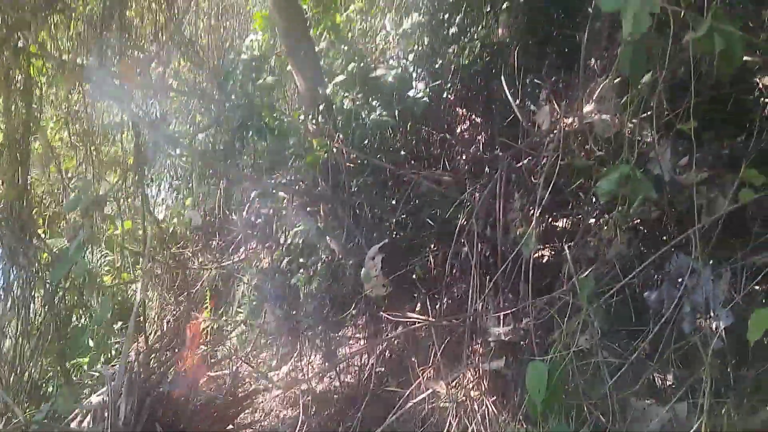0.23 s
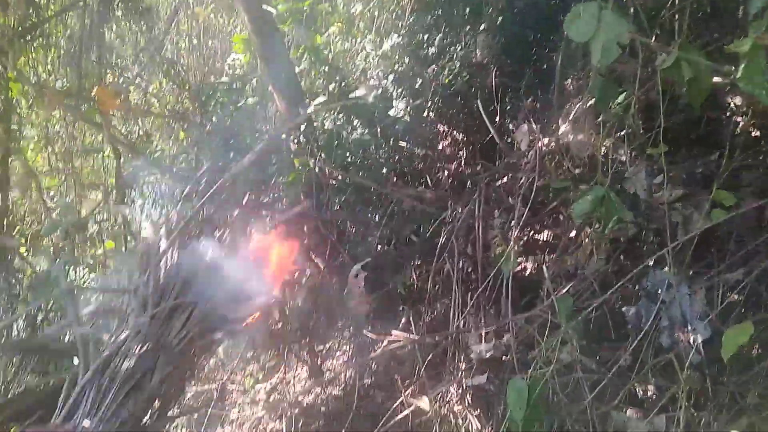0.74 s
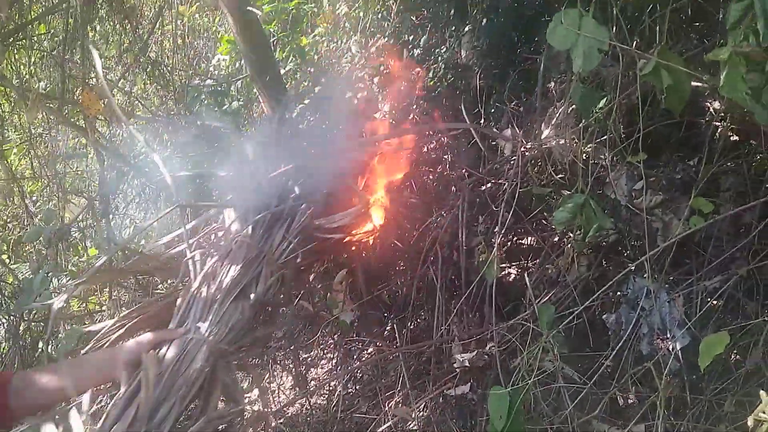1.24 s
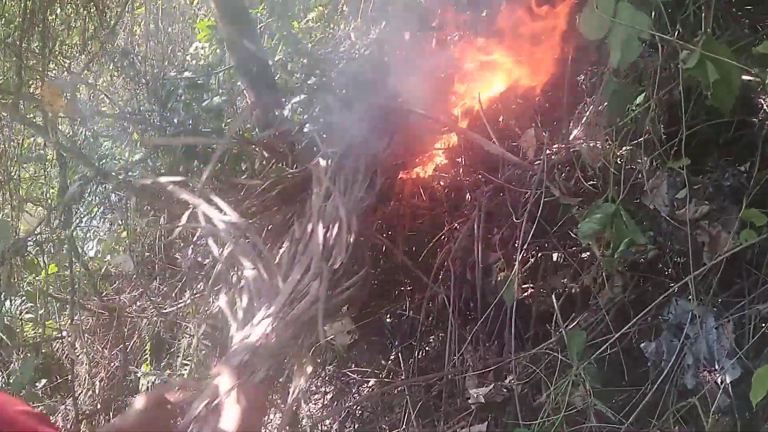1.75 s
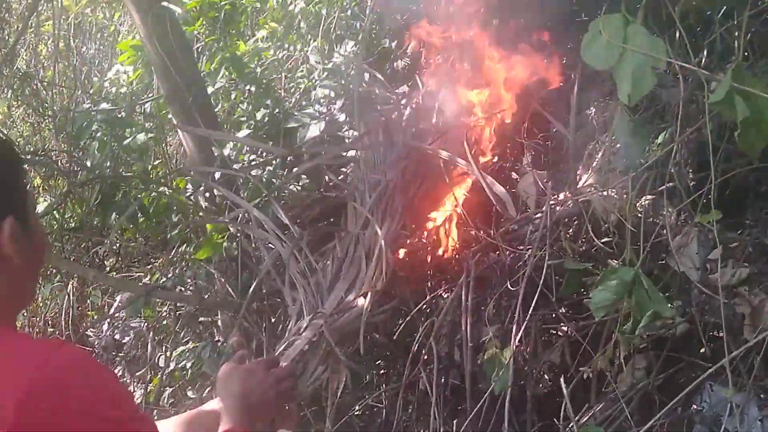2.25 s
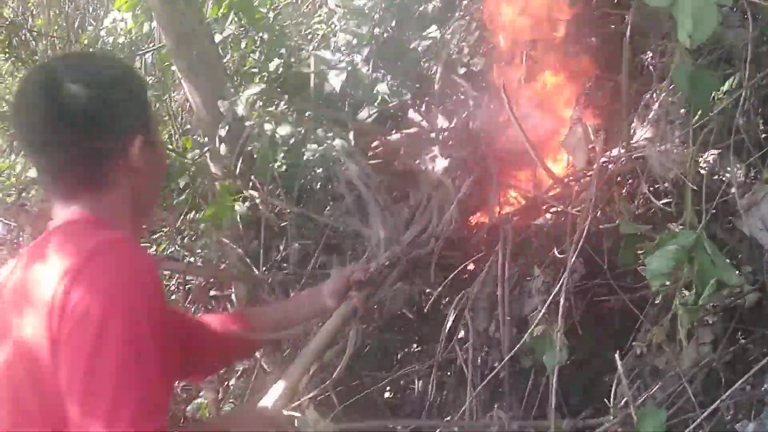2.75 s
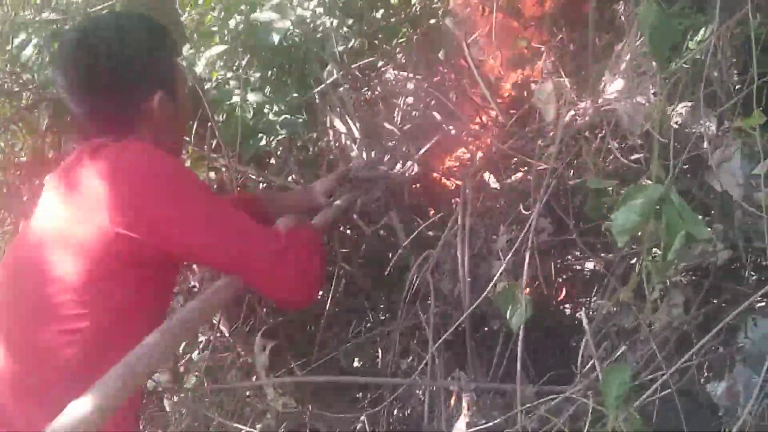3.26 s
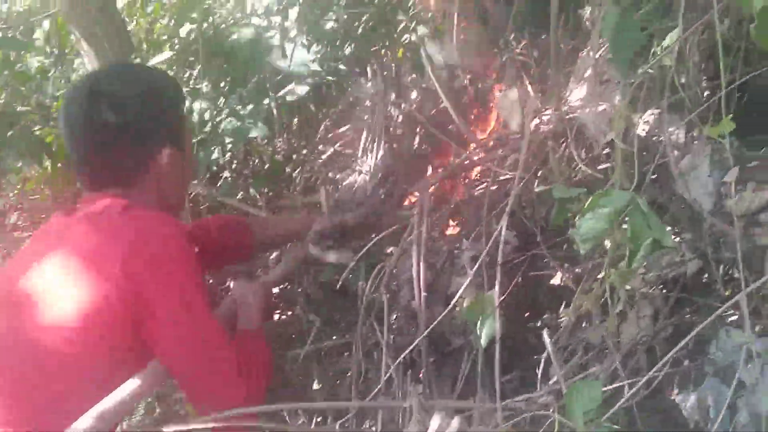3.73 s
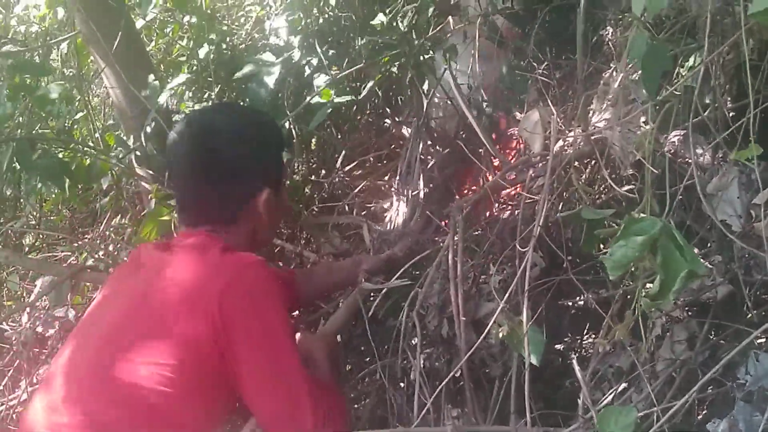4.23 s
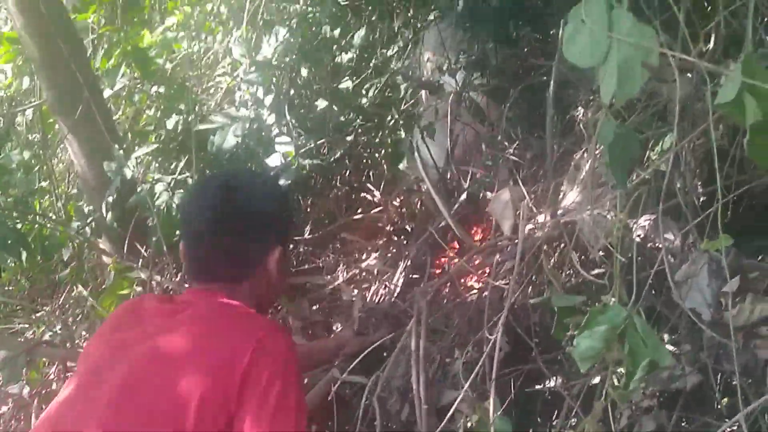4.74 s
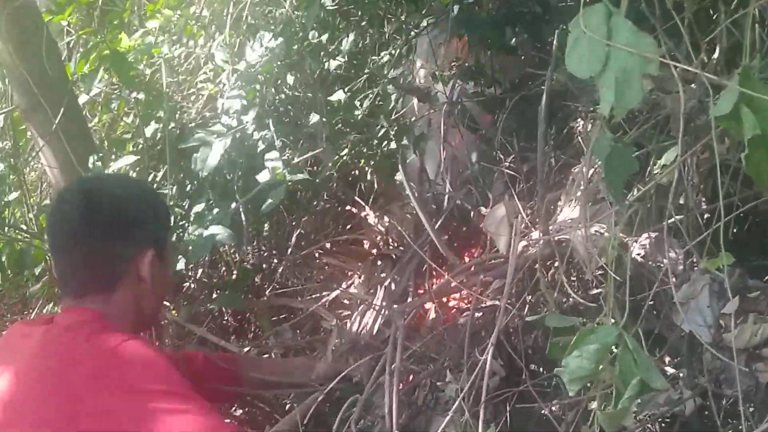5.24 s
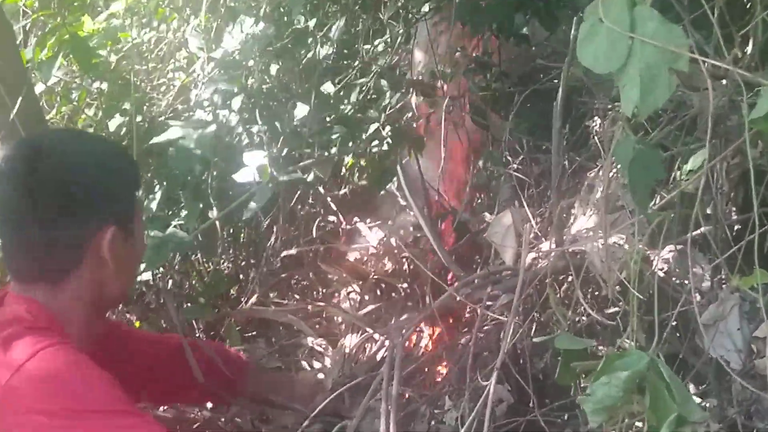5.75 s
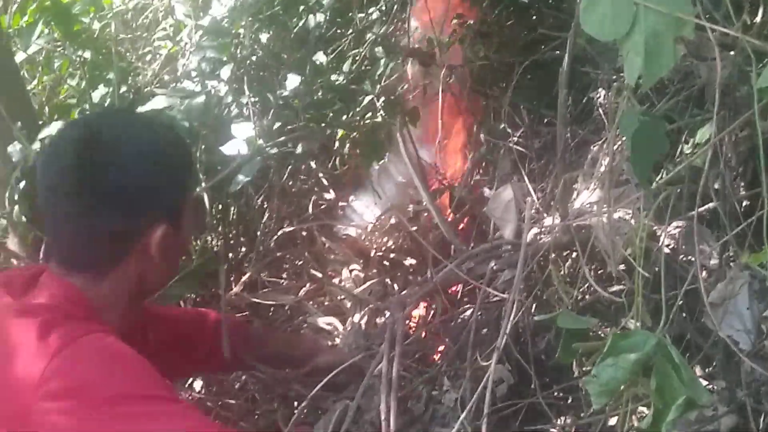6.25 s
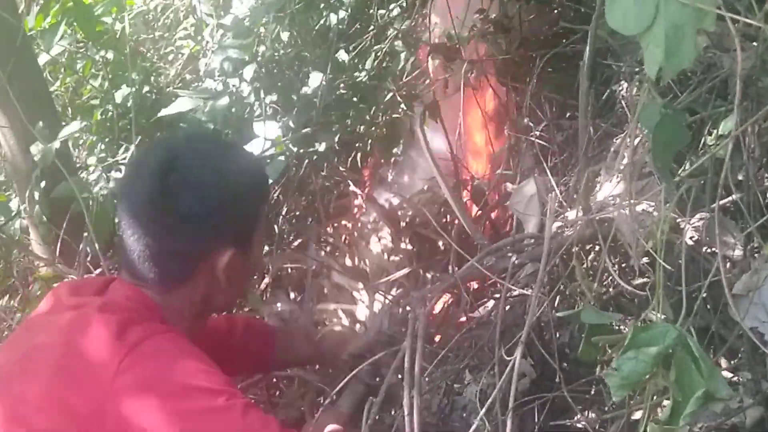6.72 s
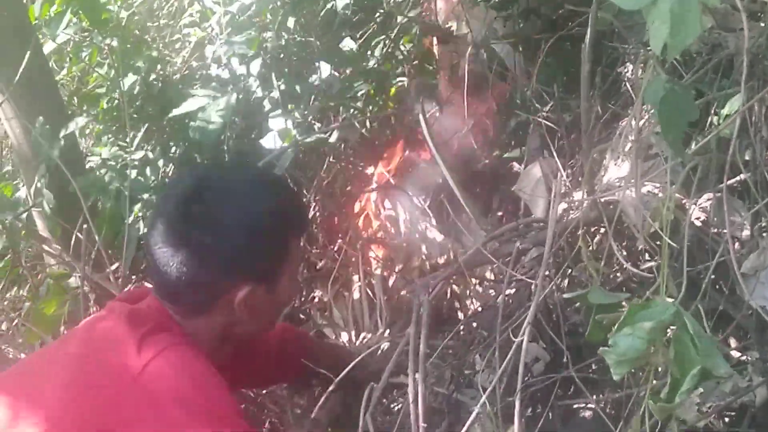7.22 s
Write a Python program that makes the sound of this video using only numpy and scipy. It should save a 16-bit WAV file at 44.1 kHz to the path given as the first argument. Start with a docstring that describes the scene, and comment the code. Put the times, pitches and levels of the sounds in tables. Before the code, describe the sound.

Burning dry leaves hiss and sizzle in uneven flares outdoors, with sharp bright crackles and pops and a few woody knocks of handled stalks.

```python
"""A torch of dry stalks is pushed into dead brush outdoors: burning leaves hiss and sizzle in flares.
The hiss is noise mixed with thousands of tiny rings, made louder and brighter by the heat.
Stems burst with sharp clicks, and scattered copies of each click come back from the thicket.
Stalks knock, rustle and squeak close to a hand-held camera, made from short rings, noise and gliding tones.
Underneath lie softly fluttering flames, a low rumble and a faint far drone, all of shaped noise."""
import sys
import numpy as np
from scipy import signal
from scipy.fft import rfft, irfft, next_fast_len
from scipy.io import wavfile
from scipy.ndimage import map_coordinates

SR = 44100
rng = np.random.default_rng(int(sys.argv[2]) if len(sys.argv) > 2 else 0)


def dump(signal):
    """Clip the signal to [-1, 1] and save it as 16-bit WAV at the path in sys.argv[1]."""
    limited = np.clip(np.atleast_2d(signal).T, -1, 1)
    pcm = np.round(limited * 32767).astype(np.int16)
    wavfile.write(sys.argv[1], SR, pcm)


N = 330088

# The far drone. Each row: time in seconds, level in dB.
DRONE_LEVEL = [(3.5, -100), (5.45, -90), (5.6, -77.5), (5.9, -75.5), (6.05, -83), (6.33, -85),
               (6.45, -76.5), (6.9, -76.5), (7.4, -76.5)]
# Colour of the open-air rumble. Each row: frequency in Hz, relative strength in dB.
RUMBLE_COLOUR = [(15, -10.5), (25, 1), (50, -2.5), (80, -5), (120, -10.5), (230, -19), (400, -24),
                 (700, -24.5), (1500, -32)]
# How alike left and right sound outdoors. Each row: frequency in Hz, likeness from 0 to 1.
LEFT_RIGHT_LIKENESS = [(30, 0.2), (70, 0.97), (630, 0.87), (1400, 0.5), (3000, 0.15), (6500, 0)]
# Faint thin squeaks, perhaps of stalks rubbing. Each row: middle in seconds, level in dB, pitch in Hz,
# half width in seconds, glide in Hz per second.
SQUEAK_EVENTS = [(4.17, -71, 1340, .018, 0), (5.725, -69.5, 2450, .016, 4500),
                 (5.76, -73, 2170, .016, -4000), (5.8, -72, 2180, .014, -1500), (5.81, -74.5, 2790, .02, 0),
                 (5.82, -73.5, 1540, .02, 3000), (5.845, -71, 2170, .028, 1500),
                 (5.864, -69, 1570, .014, 2000), (5.903, -70, 1520, .014, -2500),
                 (7.355, -68, 1900, .022, 2000)]
# Stalks knocking against the brush. Each row: start in seconds, clack in dB, thud in dB, ring in Hz,
# clean ring over the clack in dB.
KNOCK_EVENTS = [(0.780, -59, -49.5, 700, -16), (1.0084, -45, -65, 2060, -12), (1.14, -75, -60.5, 500, -16),
                (1.297, -51.5, -55, 756, -17), (2.53, -56, -64, 550, -14), (3.846, -38.5, -52, 2000, -8),
                (3.855, -45.5, -51, 1410, -18), (4.259, -49.5, -76, 1910, -20),
                (4.266, -52.5, -77, 1160, -18), (4.68, -51.5, -74, 1550, 11), (4.746, -58, -58, 600, -16),
                (5.038, -60, -74, 560, -12), (6.175, -59.5, -58.5, 590, -8), (7.31, -59, -76, 540, 1),
                (7.35, -57, -62, 1890, -10)]
# How a split, hollow stalk rings. Each row: multiple of its ring pitch, level in dB,
# time to fall 60 dB in seconds.
STALK_RINGS = [(.77, -7, .06), (1, 0, .035), (1.11, -3, .03), (1.26, -5, .03)]
# How the heap answers a push. Each row: frequency in Hz, relative strength in dB.
HEAP_COLOUR = [(60, 5), (130, -4.5), (210, 3.5), (350, -5.5), (800, -9.5), (2000, -18)]
# Colour of shifting leaves. Each row: frequency in Hz, relative strength in dB.
LEAF_COLOUR = [(88, -38), (150, -15.5), (296, -6.5), (377, -8), (637, -4), (782, -6), (1500, -1),
               (2320, 1.5), (2960, -1), (3200, 0.5), (4160, -15), (7040, -120)]
# Stalks shoved through the leaves. Each row: middle in seconds, rustle in dB, half width in seconds.
SHOVE_EVENTS = [(.2, -67.5, 0.19), (7.36, -67, 0.033)]
# How hard the leaves burn: the heap catches, is smothered, and catches again.
# Each row: time in seconds, hiss in dB.
BLAZE_LEVEL = [(0, -48.5), (.45, -46.5), (.72, -43.5), (1.38, -45), (1.53, -42), (2.4, -40), (3.02, -36.5),
               (3.44, -42), (3.8, -40), (3.92, -47), (4.42, -55.5), (5.3, -52), (6.05, -54.5), (6.4, -55),
               (6.65, -61), (6.76, -46.5), (7.2, -43), (7.41, -52.5)]
# A tuft flares up and dies down. Each row: middle in seconds, hiss in dB, half width in seconds.
FLARE_EVENTS = [(0.087, -48.5, 0.011), (0.205, -42, 0.023), (0.66, -48, 0.014), (0.83, -49, 0.044),
                (0.98, -41, 0.015), (1.255, -38, 0.032), (1.9, -38, 0.032), (2.294, -36.5, 0.022),
                (2.511, -36, 0.032), (2.92, -40, 0.027), (3.154, -40.5, 0.011), (3.33, -43, 0.028),
                (3.854, -35, 0.024), (4.21, -45.5, 0.14), (4.61, -45.5, 0.099), (4.83, -40.5, 0.069),
                (4.95, -48.5, 0.15), (5.43, -52.5, 0.076), (6.14, -52, 0.05), (6.57, -51, 0.12)]
# Stems bursting. Each row: start in seconds, crack in dB, pitch in Hz, body in dB, treble in dB,
# splintering in seconds.
STEM_POPS = [(0.1846, -38.5, 7000, 5, 2, .001), (0.3558, -41.5, 8200, 4, 2, .0005),
             (0.4883, -34, 8000, 2, 2, .0002), (0.5153, -27.5, 8000, 4, 1, .0006),
             (0.5729, -28.5, 7500, 3, 3, .0005), (0.5845, -37, 7500, 4, 0, .0003),
             (0.7435, -34, 6000, 13, 0, .0009), (.8032, -38, 7500, 6, 0, .0006),
             (.8216, -37, 7500, 6, 0, .0005), (0.8704, -37, 3600, 20, 0, .0008),
             (.9653, -39, 7500, 8, 0, .0005), (0.9743, -34.5, 4200, 15, 0, .0008),
             (1.0096, -17.5, 8400, 4, -4, .0008), (1.1148, -38, 3800, 18, 0, .0008),
             (1.2567, -33, 7600, 4, -2, .0005), (1.2639, -28, 7200, 3, -2, .001),
             (1.339, -19, 8900, 1, -2, .0002), (1.4739, -38, 8100, 0, 0, .0003),
             (1.4914, -36.5, 7800, 10, 0, .0005), (1.6165, -32, 3700, 17, 0, .0008),
             (1.7267, -41.5, 3700, 19, 0, .0006), (1.748, -32.5, 3700, 15, 0, .0014),
             (1.8684, -36, 3700, 14, 0, .001), (1.8982, -31, 8100, 2, -3, .0006),
             (1.9055, -33, 7300, 2, -3, .0005), (1.9283, -38, 3700, 17, 0, .0004),
             (2.1667, -35, 8000, 0, 0, .0003), (2.2941, -30, 7600, 0, -2, .0006),
             (2.3143, -32, 9000, 2, 0, .0004), (2.33, -21.5, 9800, -1, 0, .0003),
             (2.5261, -31, 8300, 2, 0, .0004), (2.619, -35, 3700, 16, 0, .0006),
             (2.6409, -31.5, 8800, 2, 0, .0003), (2.8076, -33, 8700, 4, 0, .0003),
             (3.0485, -18, 10500, 0, -1, .0014), (3.1524, -32, 8300, 0, -2, .0006),
             (3.334, -33, 8600, 2, 0, .0005), (3.542, -27.5, 8900, 3, 0, .0009),
             (3.5732, -32, 8600, -3, 0, .0002), (3.8388, -31, 9000, 3, 0, .0004),
             (4.0471, -44.5, 3600, 18, 0, .0006), (4.0831, -41, 8800, 1, 0, .0003),
             (4.1437, -36, 9700, 1, 0, .0007), (4.2091, -39, 9000, 2, 0, .0003),
             (4.2469, -29.5, 8900, 1, 0, .0002), (4.6803, -22.5, 10800, 3, -1, .0008),
             (4.9601, -42, 8800, 3, 0, .0004), (5.3776, -44, 9300, 2, 0, .0004),
             (5.4186, -36.5, 9600, 6, 0, .0005), (5.5653, -46, 9300, 2, 0, .0005),
             (5.9313, -46, 9500, 2, 2, .0003), (6.1037, -40, 10500, 0, 3, .0002),
             (6.1099, -42, 11000, 6, 1, .0003), (6.1969, -44, 9700, 0, 2, .0004),
             (6.4883, -22, 11000, -3, 1, .0015), (6.4989, -38.5, 9800, -3, 0, .0005),
             (6.6719, -38.5, 10300, -6, 2, .0003), (6.6756, -41, 8700, -1, 0, .0004),
             (6.7007, -29, 9500, -1, -1, .0007), (6.7084, -36, 9500, 0, 0, .0003),
             (6.7146, -33.5, 9400, -1, 0, .0006), (6.8551, -38.5, 9600, 0, 0, .0003),
             (6.8647, -38.5, 9800, -1, 0, .0004), (6.969, -37.5, 9600, 0, 0, .0004),
             (6.9832, -34.5, 10000, -1, 0, .0004), (7.0765, -24, 10000, 2, 2, .00015)]
# Colour shared by all burst stems. Each row: frequency in Hz, relative strength in dB.
STEM_COLOUR = [(300, -39), (1000, -31), (1700, -25), (2700, -24), (3700, -17), (5000, -15), (7500, 0),
               (10000, 0), (11500, -2.5), (14000, -5.5)]
# Leaves throw back less of the highest treble. Each row: frequency in Hz, echo gain in dB.
THICKET_COLOUR = [(3000, 2), (8000, 0), (11000, -2), (14000, -2.5)]
# Colour of the leaf hiss. Each row: frequency in Hz, relative strength in dB.
HISS_COLOUR = [(1500, -37), (2400, -14), (2950, -19), (3500, -6.5), (3900, -6.5), (4800, -10.5), (6200, -5),
               (7300, -0.5), (8000, 0), (9700, -2.5), (11500, -8), (14200, -13.5)]
# Finer fuel hisses higher. Each row: time in seconds, treble tilt in dB per octave.
FUEL_FINENESS = [(0, -1), (.25, 1.5), (.6, 4.5), (1.3, 2), (3.05, 5), (4.65, 2.5), (4.83, 4.5), (5, 4),
                 (5.3, 7), (5.9, 3), (6.35, 7), (6.8, 7), (7.4, 4.5)]
# The hiss moves as the camera swings round to face the fire.
# Each row: time in seconds, left minus right in dB.
HISS_PLACE = [(.3, -8.5), (.55, -1.5), (3, 0.5), (4, -2), (7.4, 0)]
# The two microphone ports colour sound differently. Each row: frequency in Hz, left minus right in dB.
PORT_DIFFERENCE = [(500, -.5), (1400, -1.5), (2500, -1.5), (3200, 6.5), (4000, 12.5), (5000, -0.5),
                   (6500, 2), (7500, 6), (9000, 13), (14000, 8.5)]

TOP_HZ = 14350  # band limit of the microphone
# The stalks shift more as the fire grows: level at the usual heat, and dB added per dB of heat.
USUAL_HEAT_DB, RUSTLE_DB, RUSTLE_GROWS = -45, -62.5, 0.79
# Until the heap catches only the torch rustles: when, over how long, and the level change.
CATCH_S, CATCH_SPREAD_S, TORCH_ONLY_DB = 1.45, 0.2, -4
# Random twig snaps: how many, level over the heat, base pitch, base body, splintering time.
TWIG_COUNT, TWIG_DB, TWIG_HZ, TWIG_BODY_DB, TWIG_SPLINTER_S = 50, 1, 8600, 5, .0005
# How far twigs differ: level and treble in dB, share of the pitch, body in dB.
TWIG_SCATTER_DB, TWIG_PITCH_SHARE, TWIG_BODY_SCATTER_DB = 3, .2, 8
BOUNCES_PER_S = 9000  # average number of separate echoes on each side


def amp(db):
    """Turn decibels into a gain."""
    return 10 ** (np.asarray(db) / 20)


def unit(x):
    """Scale a sound to an average (rms) strength of 1."""
    return x / np.sqrt(np.mean(x ** 2) + 1e-20)


def along(points, hz):
    """Read (Hz, value) rows between their points, on a log frequency axis."""
    f, v = np.transpose(points)
    return np.interp(np.log(hz + 1), np.log(f + 1), v)


def curve(rows, t=None):
    """Join (seconds, value) rows by straight lines."""
    return np.interp(np.arange(N) / SR if t is None else t, *np.transpose(rows))


def wobble(rate):
    """A smooth random curve through `rate` random points a second."""
    knots = rng.standard_normal(N // 20)
    return map_coordinates(knots, [np.arange(N) * rate / SR], mode="wrap")


def filtered(x, response):
    """Multiply the spectrum of x by a function of frequency."""
    n = x.shape[-1]
    m = next_fast_len(n + SR // 10)
    return irfft(rfft(x, m) * response(np.fft.rfftfreq(m, 1 / SR)), m)[..., :n]


def causal(gain, size=2048):
    """The quickest impulse response that has this gain at each frequency."""
    cepstrum = irfft(np.log(np.maximum(gain(np.fft.rfftfreq(size, 1 / SR)), 1e-6)))
    # folding the second half onto the first removes any sound before the impulse
    cepstrum[1:size // 2] *= 2
    cepstrum[size // 2 + 1:] = 0
    return irfft(np.exp(rfft(cepstrum)))


def spread(pair, spectrum):
    """Colour two unrelated signals and mix them into a stereo sound of rms 1."""
    def mid_side_gains(hz):
        # this angle makes left and right as alike as the table says
        angle = np.arccos(np.clip(along(LEFT_RIGHT_LIKENESS, hz), -1, 1)) / 2
        return amp(along(spectrum, hz)) * [np.cos(angle), np.sin(angle)]
    mid, side = filtered(pair, mid_side_gains)
    return unit(np.array([mid + side, mid - side]))


def add(track, s, sound):
    """Mix a sound into a track at time s."""
    part = track[:, max(round(s * SR), 0):][:, :sound.shape[-1]]
    part += sound[..., :part.shape[-1]]


def swells(rows, t):
    """Summed power at times t of bell-shaped swells (seconds, dB, half width in seconds)."""
    return sum(amp(db) ** 2 * np.exp(-((t - s) / width) ** 2) for s, db, width in rows)


def puffs(rate, scatter_db, life):
    """Envelope of random little fractures of unequal size, each falling 60 dB in `life` seconds."""
    happens = rng.random(N) < rate / SR
    sizes = happens * amp(scatter_db * np.minimum(rng.standard_normal(N), 2.7))
    t = np.arange(SR // 20) / SR
    # -120 because this decay acts on power
    power = signal.fftconvolve(sizes ** 2, amp(-120 * t / life))[:N]
    return unit(np.sqrt(np.abs(power)))


def pings(rate, scatter_db, life, size=200):
    """Tiny splits in the leaves: each rings briefly at its own pitch, out of step at the two ports."""
    count = int(rate * N / SR)
    when, pitch, strength, left, right = rng.random((count, 5)).T[:, :, None]
    t = np.arange(size) / SR
    envelope = amp(-scatter_db * np.log(strength + .01) - 60 * t / life)
    hz = 1500 + 13000 * pitch
    index = ((when * N).astype(int) + np.arange(size)).ravel()
    sides = []
    for phase in (left, right):
        rings = envelope * np.sin(2 * np.pi * (hz * t + phase))
        sides.append(np.bincount(index, rings.ravel(), N)[:N])
    return unit(np.array(sides))


def heat(t):
    """Strength of the fire in dB at times t: the slow blaze with its flares on top."""
    return 10 * np.log10(amp(curve(BLAZE_LEVEL, t)) ** 2 + swells(FLARE_EVENTS, t))


def outdoors(drone_hz=912, width_hz=85):
    """Low rumble of the open air, and a breathy far drone: noise in a narrow band that comes up late."""
    rumble_level = amp(-67.5 + 1.34 * wobble(rate=3.0))
    rumble = rumble_level * spread(rng.standard_normal((2, N)), RUMBLE_COLOUR)
    band = lambda hz: np.exp(-((hz - drone_hz) / width_hz) ** 2)
    drone = unit(filtered(rng.standard_normal(N), band))
    return rumble + amp(curve(DRONE_LEVEL)) * drone


def squeaks():
    """Thin gliding tones that swell and fade, shaken in pitch and level as the stalk slips."""
    t = np.arange(N) / SR
    shake_hz = 45 * wobble(rate=150)
    grip = unit(amp(3 * wobble(rate=90)))
    total = np.zeros(N)
    for s, db, hz, half_width, glide in SQUEAK_EVENTS:
        pitch_hz = hz + glide * (t - s) + shake_hz
        tone = np.sqrt(2) * np.sin(2 * np.pi * np.cumsum(pitch_hz) / SR)
        total += amp(db) * np.exp(-((t - s) / half_width) ** 2) * tone
    return grip * total


def knocks(clack_t60=0.068, thud_t60=0.046, scrape_t60=0.23, settle_db=-24):
    """A stalk strikes: a woody clack, a scrape of leaves, and a push into the heap, which then settles."""
    # each t60 is the time in seconds to fall 60 dB
    track, t = np.zeros((2, N)), np.arange(SR // 5) / SR
    burst = lambda spectrum, t60: spread(rng.standard_normal((2, len(t))), spectrum) * amp(-60 * t / t60)
    heap = causal(lambda hz: amp(along(HEAP_COLOUR, hz)))[None]
    soft_heap = filtered(heap, lambda hz: 1 / (1 + 1j * hz / 2000) ** 2)  # dulls the treble
    for s, clack_db, thud_db, ring_hz, ring_db in KNOCK_EVENTS:
        # the stalk rings briefly inside a broad, rattling resonance
        ring = sum(amp(db - 60 * t / t60) * np.sin(2 * np.pi * multiple * ring_hz * t)
                   for multiple, db, t60 in STALK_RINGS)
        clack = burst([(ring_hz / 2, -20), (ring_hz, 0), (ring_hz * 3.2, -17), (ring_hz * 5, -35)], clack_t60)
        scrape = burst([(200, -22), (2200, 3), (6000, -3.5)], scrape_t60)
        strike = amp(ring_db) * ring + clack + amp(-6.5) * scrape
        soft_start = 1 - np.exp(-t / 0.001)
        add(track, s, amp(clack_db) * strike * soft_start)
        settling = amp(settle_db - 60 * t / thud_t60) * rng.standard_normal((2, len(t)))
        push = (t == 0) + settling
        thud = signal.fftconvolve(push, soft_heap, axes=1)
        # each side carries as much energy as 5 ms at rms 1
        thud *= np.sqrt(SR / 200) / np.linalg.norm(thud, axis=1, keepdims=True)
        add(track, s, amp(thud_db) * thud)
    return track


def rustle():
    """The duller crunch of stalks and leaves shifting: noise in random puffs that follows the heat."""
    t = np.arange(N) / SR
    unlit = (1 - np.tanh((t - CATCH_S) / CATCH_SPREAD_S)) / 2
    level_db = RUSTLE_DB + RUSTLE_GROWS * (heat(t) - USUAL_HEAT_DB) + TORCH_ONLY_DB * unlit
    fractures = np.sqrt(1 + amp(-6.5) * puffs(rate=160, scatter_db=6, life=0.049) ** 2)
    crunch = rng.standard_normal((2, N)) * fractures
    level = np.sqrt(amp(level_db) ** 2 + swells(SHOVE_EVENTS, t))
    return level * amp(1.47 * wobble(rate=24)) * spread(crunch, LEAF_COLOUR)


def flames():
    """The flames flutter softly in the bass: low noise that grows with the blaze."""
    colour = [(35, -26), (75, -12.5), (140, -20.0), (400, -25.5), (1000, -37)]
    return amp(curve(BLAZE_LEVEL) - 31.5) * spread(rng.standard_normal((2, N)), colour)


def twigs():
    """Small random snaps that follow the heat, as rows with the same columns as the stem pops."""
    # starting at -0.73 keeps the first part of the scene free of these snaps
    when, strength, pitch, body, treble = rng.uniform(-0.73, 1, (TWIG_COUNT, 5)).T
    s = (when + 1) / 2 * N / SR
    db = heat(s) + TWIG_DB + TWIG_SCATTER_DB * strength
    pitch_hz = TWIG_HZ * (1 + TWIG_PITCH_SHARE * pitch)
    body_db = TWIG_BODY_DB + TWIG_BODY_SCATTER_DB * body
    treble_db = TWIG_SCATTER_DB * treble
    return list(zip(s, db, pitch_hz, body_db, treble_db, np.full(TWIG_COUNT, TWIG_SPLINTER_S)))


def pops(splinter_db=-7.0, near_db=-11.5, near_t60=0.067, far_db=-28, far_t60=0.37, lean_db=2):
    """A stem bursts with a click and splinters; near twigs echo it briefly, the thicket for longer."""
    track, t = np.zeros((2, N)), np.arange(SR // 5) / SR
    scatter = amp(near_db - 60 * t / near_t60) + amp(far_db - 60 * t / far_t60)
    # the click reaches the left port one sample after the right
    click = np.eye(2, len(t))[::-1]
    for s, db, pitch_hz, body_db, treble_db, splinter_s in STEM_POPS + twigs():
        # each stem stresses its own pitch; thicker ones have more body, brittle ones more treble
        def stem_gain(hz):
            peak = 7 / (1 + ((hz - pitch_hz) / 750) ** 2)
            body = body_db / (1 + (hz / 6000) ** 10)
            treble = treble_db * (1 + np.tanh((hz - 11000) / 800)) / 2
            return amp(along(STEM_COLOUR, hz) + peak + body + treble)
        stem = causal(stem_gain)[None]
        stem /= np.linalg.norm(stem)
        splinters = amp(splinter_db) * np.exp(-t / splinter_s) * rng.standard_normal((2, len(t)))
        direct = signal.fftconvolve(click + splinters, stem, axes=1)
        # each side carries as much energy as 1 ms at rms 1
        direct *= np.sqrt(SR / 1000) / np.linalg.norm(direct, axis=1, keepdims=True)
        # the camera body shades the right port from the direct sound
        direct *= amp(lean_db * np.array([[.5], [-.5]]))
        strengths = rng.standard_normal((2, len(t)))
        bounces = unit(strengths * (rng.random((2, len(t))) < BOUNCES_PER_S / SR))
        echoes = signal.fftconvolve(scatter * bounces, stem, axes=1)
        echoes = filtered(echoes, lambda hz: amp(along(THICKET_COLOUR, hz)))
        add(track, s, amp(db) * (direct + echoes))
    return track


def hiss():
    """Gas jets from countless leaf cells: a rush with a dense sizzle, all swelling with the flames."""
    sizzle = amp(-4) * pings(rate=3500, scatter_db=2.6, life=.006)
    rush = spread(unit(rng.standard_normal((2, N)) + sizzle), HISS_COLOUR)
    # split into short time slices to set loudness and treble tilt together
    hz, t, slices = signal.stft(rush, SR, nperseg=256)
    octaves = np.log2(np.clip(hz, 6000, 13000) / 8500)[:, None]
    gain_db = heat(t) + octaves * curve(FUEL_FINENESS, t)
    rush = signal.istft(slices * amp(gain_db), SR, nperseg=256)[1][:, :N]
    # small spurts start at once and die away
    spurts = unit(np.sqrt(1 + amp(-15) * puffs(rate=70, scatter_db=2, life=.04) ** 2))
    flicker_db = 0.89 * wobble(rate=30)
    place_db = np.outer([.5, -.5], curve(HISS_PLACE))
    return amp(flicker_db + place_db) * spurts * rush


def scene():
    """The fire and the handled stalks over the outdoor floor."""
    return outdoors() + squeaks() + knocks() + rustle() + flames() + pops() + hiss()


def record(dry):
    """Each port colours the sound its own way; a steep cut removes what lies above the band limit."""
    def ports(hz):
        gains = amp(np.outer([.5, -.5], along(PORT_DIFFERENCE, hz)))
        # the two ports together keep the same power at every frequency
        gains /= np.sqrt(np.mean(gains ** 2, axis=0))
        return gains / np.sqrt(1 + (hz / TOP_HZ) ** 400)
    return filtered(dry, ports)


dry = scene()
out = record(dry)
dump(out)
```